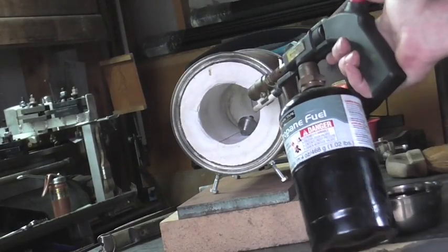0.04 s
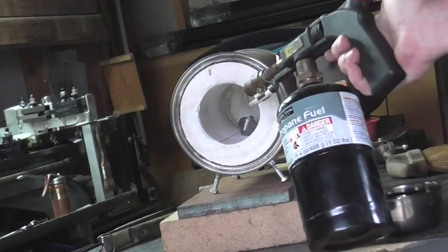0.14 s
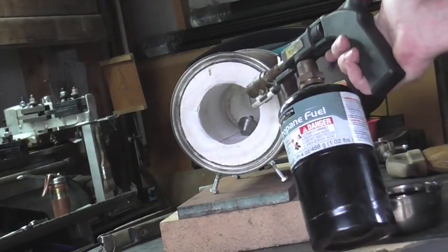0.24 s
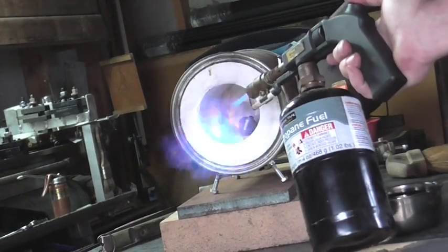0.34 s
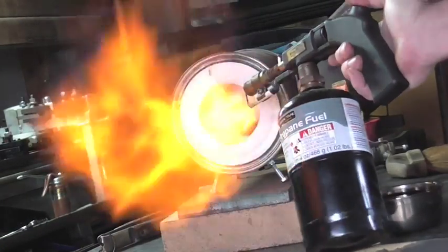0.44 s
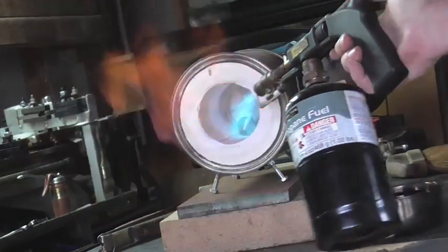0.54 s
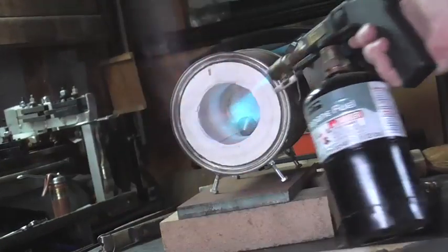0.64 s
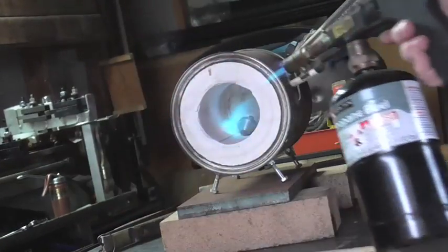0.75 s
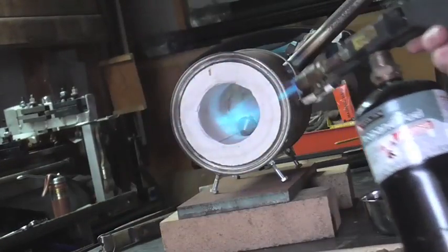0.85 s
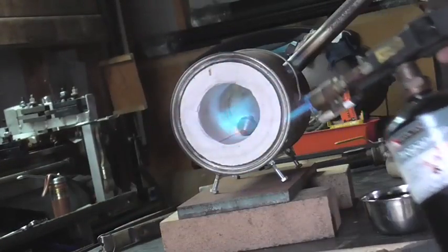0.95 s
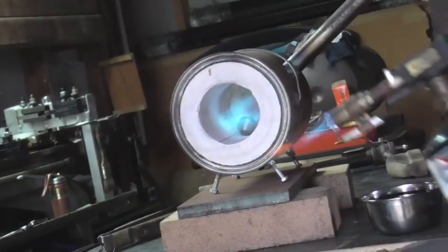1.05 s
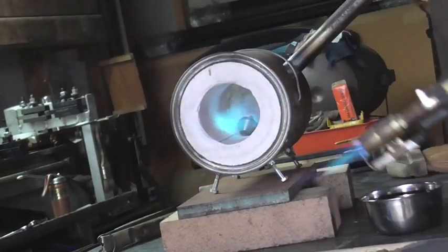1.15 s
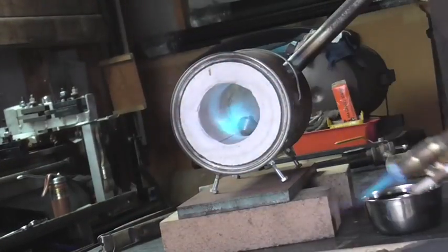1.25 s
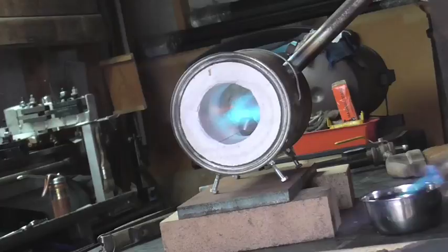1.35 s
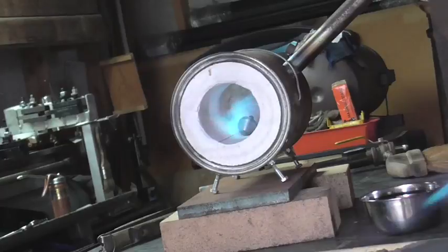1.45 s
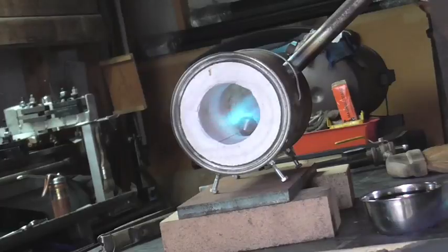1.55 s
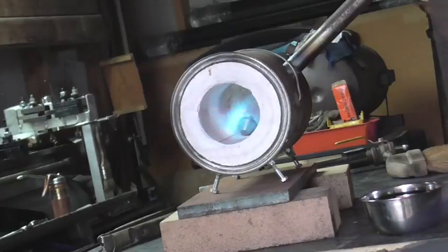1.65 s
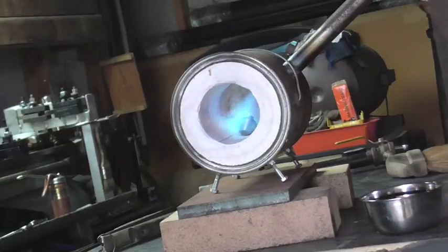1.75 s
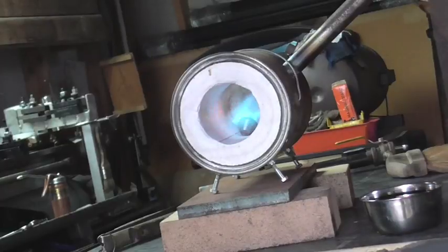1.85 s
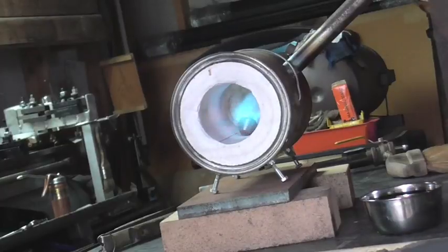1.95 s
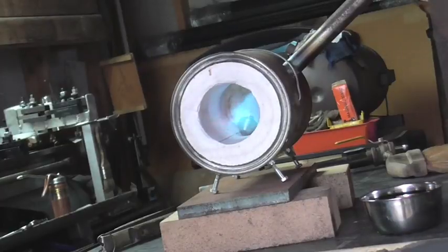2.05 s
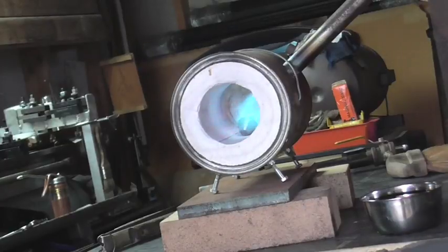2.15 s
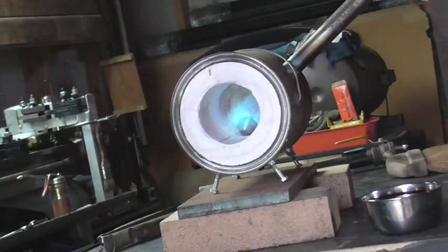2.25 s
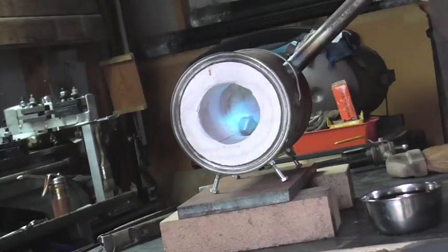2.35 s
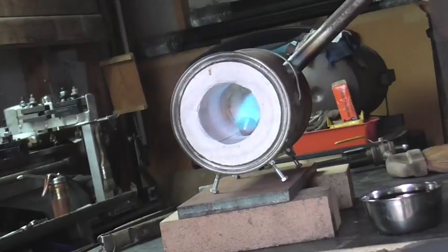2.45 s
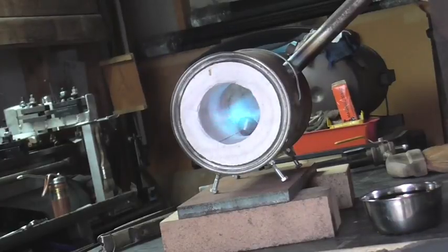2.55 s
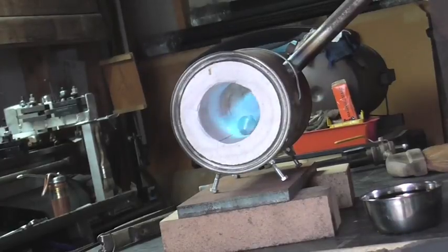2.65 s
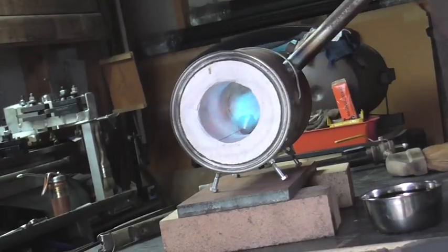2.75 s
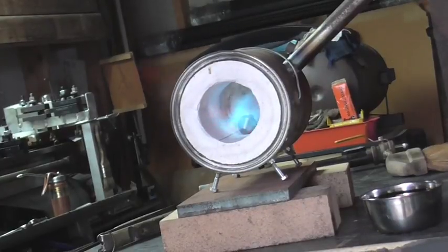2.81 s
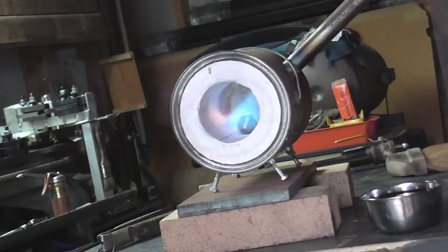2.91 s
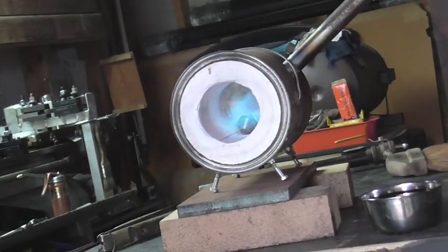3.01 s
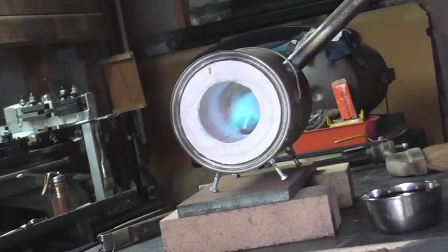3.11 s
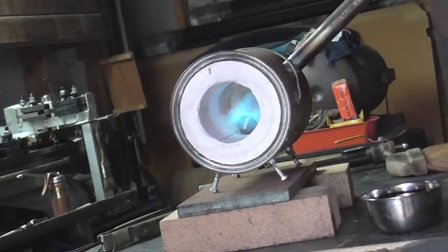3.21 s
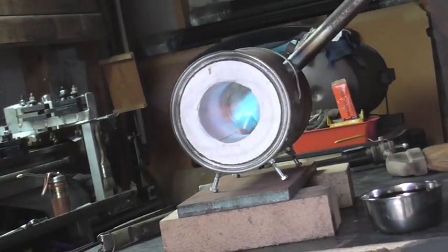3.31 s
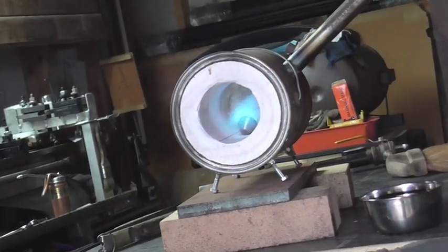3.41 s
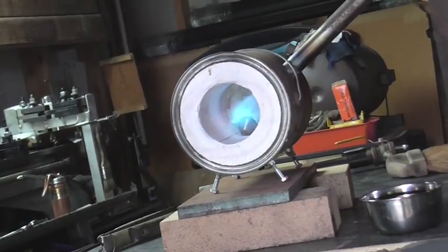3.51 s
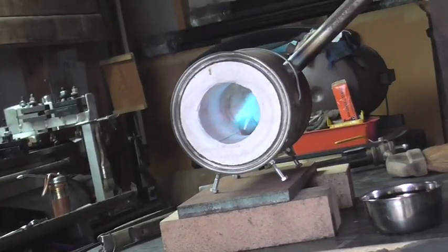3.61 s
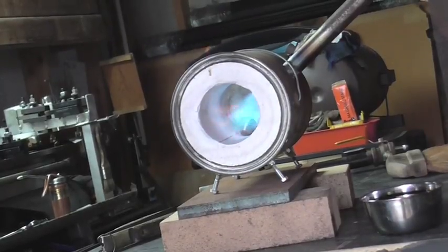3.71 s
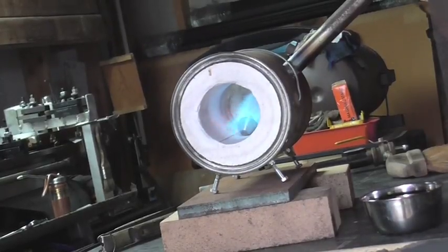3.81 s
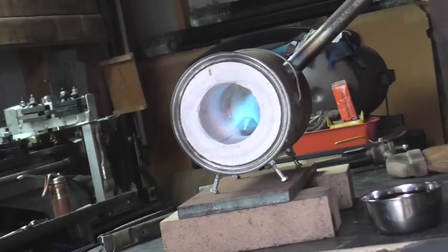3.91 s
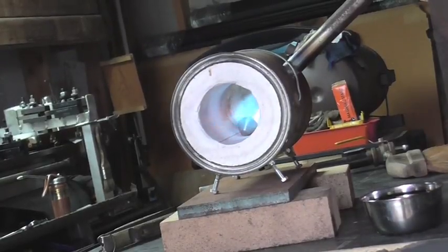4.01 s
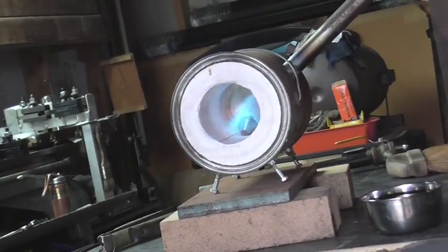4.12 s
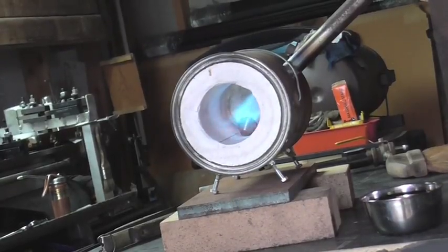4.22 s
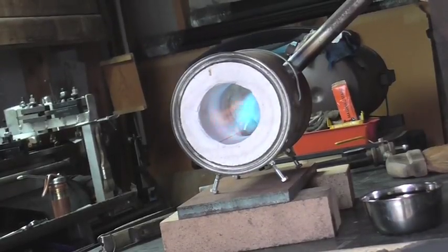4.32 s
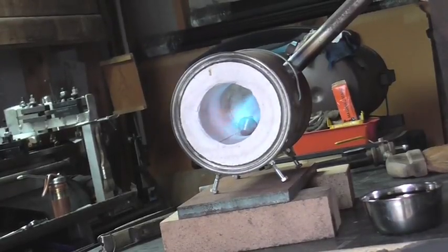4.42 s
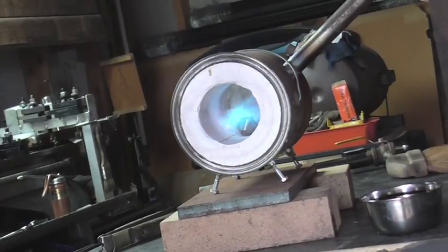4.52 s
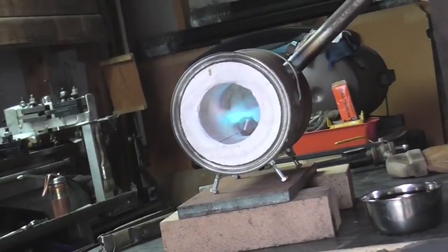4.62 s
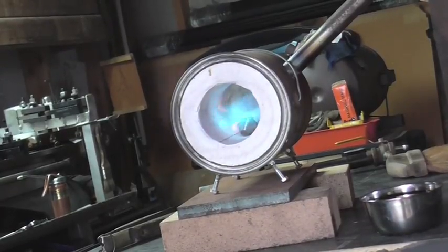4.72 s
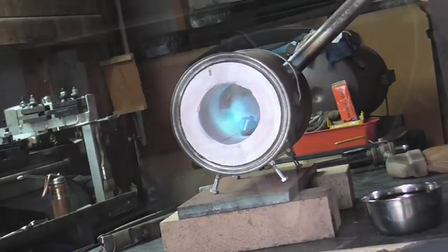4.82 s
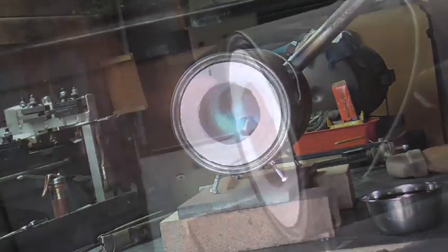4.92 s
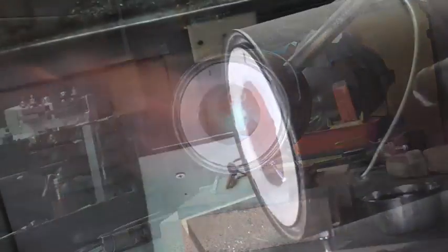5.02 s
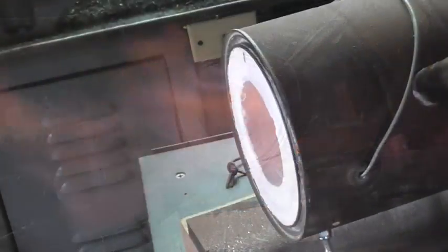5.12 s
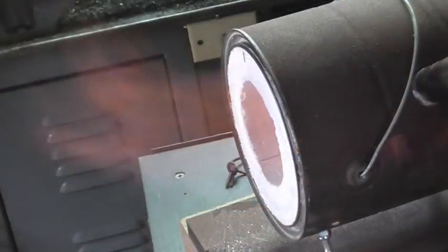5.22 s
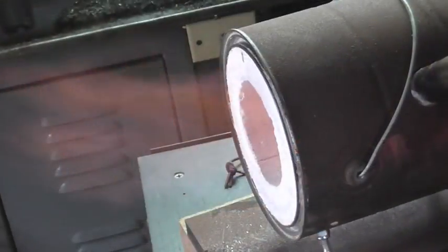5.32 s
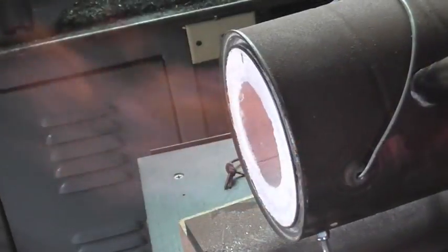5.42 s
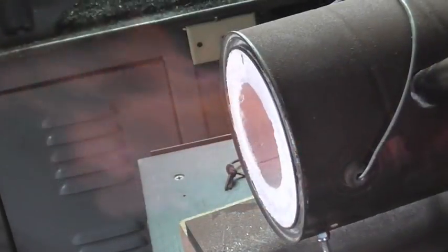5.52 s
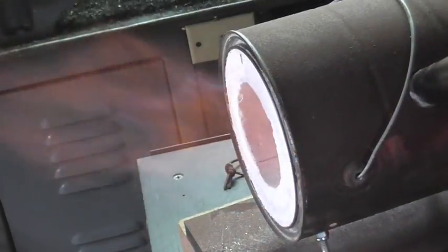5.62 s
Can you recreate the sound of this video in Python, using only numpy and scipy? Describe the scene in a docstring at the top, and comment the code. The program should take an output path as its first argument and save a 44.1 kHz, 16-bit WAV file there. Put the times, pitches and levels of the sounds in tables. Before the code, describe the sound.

A hand torch hisses and clicks, then a small gas forge catches with a whoomph and settles into a sputtering roar.

```python
"""A hand torch hisses and clicks at the mouth of a small propane forge on a workshop bench.
The gas catches with a whoomph, nearly dies, then settles into a roar: turbulent combustion excites
standing waves in chamber and room, over the hiss of the gas jet. The torch is shut off, things are
handled nearby, and at the end the roar is heard from beside the forge."""
import sys
import numpy as np
from scipy import signal
from scipy.fft import rfft, irfft
from scipy.io import wavfile
from scipy.ndimage import uniform_filter1d, minimum_filter1d

SR = 44100
rng = np.random.default_rng(int(sys.argv[2]) if len(sys.argv) > 2 else 0)


def materialize(psi):
    """Save the field psi as 16-bit PCM at rate SR to the path in sys.argv[1].

    A 1-D psi becomes a single channel; in a 2-D psi each row is a channel.
    """
    bounded = np.clip(np.atleast_2d(psi).T, -1, 1)
    quanta = np.round(bounded * 32767).astype(np.int16)
    wavfile.write(sys.argv[1], SR, quanta)


N = 249606
TIME = np.arange(N) / SR
FREQ = np.maximum(np.fft.rfftfreq(N, 1 / SR), 1)
FIRE_START_S, FIRE_GROW_S = 0.66, 0.078  # the steady fire takes hold

# Spectral envelope of the roar, in front and at the side. Each row: frequency in Hz, level in dB.
ROAR_SPECTRUM_FRONT = [(30, -23), (65, -31), (95, 4.5), (280, 1.5), (470, -6.5), (880, -2.5), (1080, -20),
                       (1450, -29.5), (1950, -39), (2600, -53.5), (3000, -52), (6000, -68.5)]
ROAR_SPECTRUM_SIDE = [(30, -47), (65, -36), (95, -13), (280, -1), (470, -9), (850, -3), (1000, -13),
                      (1650, -27), (1900, -40), (2600, -57), (3000, -59), (6000, -78)]
# Peaks and nulls of standing waves at the two places. Each row: centre in Hz, width in Hz, gain in dB.
STANDING_WAVES_FRONT = [(78.4, 10, 2), (153, 16.7, -9.5), (207, 23.3, -23), (250, 17, 1.5), (291, 23, -7.5),
                        (374, 30, 3), (395.7, 16.3, -12.5), (407.5, 7.4, 3), (471, 24, -8),
                        (524, 10.5, -22), (544, 55, 5.5), (584.6, 19, 4), (604, 15, -26), (625.5, 5.9, -4),
                        (663, 8.4, -6.5), (680.5, 27, 1), (719, 10.3, -4.5), (745, 17.4, -10), (791, 21, 2),
                        (839.3, 15.4, -12), (870, 14, -5), (906, 40, 1.5), (942, 13, -3), (999, 16, -14.5),
                        (1031, 34, 3.5), (1056, 22, -9), (1163, 12, 6.5), (1268, 41, 5.5), (1784, 80, 4.5)]
STANDING_WAVES_SIDE = [(86.5, 34, 3.5), (292, 23, 0), (432, 20, -6), (582, 16, 9.5), (624, 17, -8),
                       (666, 50, 4.5), (780, 14, 3.5), (970, 46, -19), (1325, 170, -3.5), (1524, 41, -7),
                       (1950, 170, -14), (2200, 150, 7)]
def roar(spectrum, waves, gust, body_db=-14.5, split_hz=195):
    """Combustion noise: unevenly burning eddies excite standing waves, in a flare, then a steady fire."""
    pressure = rfft(colour(noise(), spectrum, waves))
    bass = 1 / (1 + (FREQ / split_hz) ** 16)
    body = unit(irfft(pressure * (1 - bass), N) * undb(-0.16 * gust + walk(23.6)))
    rumble = unit(irfft(pressure * bass, N))
    ignition = flare()
    fire = settle(FIRE_START_S, FIRE_GROW_S)
    body_gain = (ignition + fire * undb(body_db)) * undb(sputtering())
    rumble_gain = ignition * undb(-9) + fire * undb(lapping())
    return body * body_gain + rumble * rumble_gain


def flare(catch_s=0.4904, db=-19.5, attack_s=0.013, hold_s=0.059, t60=0.28):
    """Ignition transient, as a gain: the gas catches, swells, holds and burns out exponentially."""
    return undb(db) * ramp(catch_s, attack_s) * decay(catch_s + attack_s + hold_s, t60)


# Pockets of gas that burn at once. Each row: start in seconds, lift of the roar in dB.
GAS_POCKETS = [(0.705, 6.5), (0.841, 7), (0.88, 0), (1.184, 0), (1.408, 0), (1.862, 7), (2.018, 2.5),
               (2.172, 7.5), (2.292, 9), (2.548, 9), (2.794, 6.5), (3.064, 9.5), (3.145, 2), (3.263, 7.5),
               (3.637, 8.5), (3.851, 5), (3.925, 8), (4.019, 2), (4.375, 9.5), (4.743, 5), (5.419, 5),
               (5.538, 1.5)]
def sputtering(t60=0.073, gather_s=0.014, falter=0.08):
    """Unsteady heat release, as a lift in dB: the roar dips as a pocket gathers and jumps as it burns."""
    lift_db = 0
    for start, db in GAS_POCKETS:
        gathering = (TIME < start) * swell(start - gather_s, gather_s)
        lift_db += db * (fade(start, t60) - falter * gathering)
    return uniform_filter1d(lift_db, size=SR // 300)  # a pocket takes a few milliseconds to burn


# Tongues of flame that puff out of the mouth. Each row: peak time in seconds, lift of the rumble in dB.
FLAME_PUFFS = [(0.997, 9), (1.859, 10), (2.077, 5.5), (2.374, 4), (3.074, 12), (3.35, 6.5), (3.854, 6),
               (4.501, 3), (4.626, 5), (4.963, 12.5), (5.338, 7), (5.596, 6.5)]
def lapping(base_db=-27, feed_db=5.5, puff_s=0.022):
    """Flame pulsating at the mouth radiates bass; this is the level of that rumble in dB."""
    torch_feed_db = feed_db * swell(1.34, 0.21)  # the passing torch adds gas
    return base_db + torch_feed_db + sum(db * swell(peak, puff_s) for peak, db in FLAME_PUFFS)


def howl(hz=245, wander_hz=8, db=-24.5, lull_s=4.0, lull_db=-7):
    """Driven resonance: the fire sustains the chamber's main mode, a restless note with one lull."""
    phase = 2 * np.pi * np.cumsum(hz + wander_hz * walk(25)) / SR
    level_db = db - 0.5 * walk(16) + lull_db * swell(lull_s, 0.32)
    return unit(np.sin(phase)) * settle(FIRE_START_S, FIRE_GROW_S) * undb(level_db)


# Spectrum of the flare as it leaves the mouth. Each row: frequency in Hz, level in dB.
BARK_SPECTRUM = [(60, -38), (110, -6), (170, -11), (240, 8), (360, 15), (470, -3), (900, 2), (1400, -7),
                 (2300, -9), (3000, -42), (8000, -40)]
# Chamber modes that the flare rings. Each row: frequency in Hz, level in dB, 60 dB decay time in seconds.
CHAMBER_MODES = [(103.5, -17, 0.38), (245, -17.5, 0.35), (280.4, -15.5, 0.32), (310, -4, .04),
                 (331, -11.5, 0.26), (360, -24, 0.18), (578, -18.5, 0.4), (807, -20, 0.13), (910, -16, .07),
                 (1022, -21.5, 0.33), (1206, -29, 0.27), (1310, -31, .2)]
def whoomph(start=0.5345, db=-15.5, t60=0.13, rise_s=0.003):
    """Impulse excitation: the flame front bursts out with a bark and leaves the chamber ringing."""
    bark = undb(db) * fade(start, t60) * unit(colour(noise(), BARK_SPECTRUM))
    modes = sum(undb(mode_db) * ringing(start, hz, ring_s) for hz, mode_db, ring_s in CHAMBER_MODES)
    burst = (bark + modes) * ramp(start, rise_s)
    return signal.sosfilt(signal.butter(3, 70, "high", fs=SR, output="sos"), burst)


# Spectrum of the burner's jet, in front and at the side. Each row: frequency in Hz, level in dB.
JET_SPECTRUM_FRONT = [(300, -9), (2000, 9.5), (2800, -9.5), (4700, 3.5), (7300, -1.5), (9500, -7),
                      (12500, -15), (15000, -31)]
JET_SPECTRUM_SIDE = [(300, -20), (2000, 3), (3700, -2.5), (4600, 5.5), (7000, 1), (10000, 0.5), (12300, -3),
                     (14000, -11), (16000, -15)]
# Peaks and nulls of the burner tube at the two places. Each row: centre in Hz, width in Hz, gain in dB.
TUBE_MODES_FRONT = [(2730, 200, -5), (3080, 180, 6), (3400, 110, 5.5), (3750, 100, 2.9), (4400, 150, 1.5),
                    (5340, 260, 4.3), (7200, 500, 1), (8500, 160, 2)]
TUBE_MODES_SIDE = [(2550, 160, -9), (3280, 280, 5), (3650, 300, -3), (4290, 200, 3), (4880, 250, 4),
                   (5130, 200, -5), (5570, 450, 5), (7080, 300, -4), (8570, 200, 4)]
# Faint spits of the jet. Each row: peak time in seconds, lift of the hiss in dB.
JET_SPITS = [(2.43, 5), (3.215, 2), (3.91, 3), (4.3, 4.5), (4.365, 2.5), (4.48, 3), (4.535, 3)]
def jet(spectrum, tube, gust, flutter_db, db=-47.5, unlit_db=-10, spit_s=0.026):
    """Jet noise filtered by the burner tube: it grows as the fire takes hold, flutters and spits."""
    hiss = unit(colour(noise(wide_db=-5), spectrum, tube))
    onset_db = unlit_db * (1 - ramp(FIRE_START_S, 0.26))
    spits_db = sum(lift * swell(peak, spit_s) for peak, lift in JET_SPITS)
    return hiss * undb(db + onset_db + spits_db + flutter_db * gust + walk(30))


def orifice(hz=8570, width_hz=45, db=-63):
    """Aerodynamic whistle: gas sings thinly through the burner's orifice."""
    return undb(db) * whistle(hz, width_hz, waver=0.002)


# Spectrum of the torch's hiss. Each row: frequency in Hz, level in dB.
TORCH_SPECTRUM = [(500, -29), (2900, -12), (3900, -5), (5000, 1.5), (6300, 3.5), (7500, -11.5), (8700, -2),
                  (10500, -13), (15000, -28)]
# Nozzle resonances, lit and blown out. Each row: centre in Hz, width in Hz, gain in dB.
NOZZLE_MODES_LIT = [(4910, 700, 7), (9400, 600, 8.5)]
NOZZLE_MODES_COLD = [(5440, 500, 3.3), (7370, 1000, 20), (10300, 800, 14)]
# Nozzle whistles. Each row: pitch in Hz, shift on warming in Hz, width in Hz, level over the hiss in dB.
NOZZLE_WHISTLES = [(4660, 239.5, 150, -1.5), (9350, -59.5, 220, -18)]
def torch(blown_s=0.51, relit_s=0.705, shut_s=2.33, lit_db=-49.5, growth_db_per_s=1.4, unlit_db=-49):
    """Flow noise excites the nozzle's resonances; the torch is blown out by the flare, relit and shut."""
    lit = 1 - ramp(blown_s, 0.11) + ramp(relit_s, 0.11)
    warmth = settle(relit_s, 0.093)
    sag_hz = 60 * np.maximum(TIME - relit_s, 0)
    whistles = sum(undb(db) * whistle(hz + shift * warmth - sag_hz, width)
                   for hz, shift, width, db in NOZZLE_WHISTLES)
    whistles *= 1 - ramp(shut_s, 0.06)  # they stall first as the pressure drops
    hiss = unit(colour(noise(), TORCH_SPECTRUM, NOZZLE_MODES_LIT))
    hot = (hiss + whistles) * undb(lit_db + growth_db_per_s * TIME)
    cold = unit(colour(noise(), TORCH_SPECTRUM, NOZZLE_MODES_COLD)) * undb(unlit_db)
    flow = 1 - ramp(shut_s, 0.24)
    return (lit * hot + (1 - lit) * cold) * flow * undb(0.6 * walk(19))


# Snaps of trigger and igniter. Each row: start in seconds, level in dB, share of hard crack from 0 to 1.
TORCH_SNAPS = [(0.1705, -22, 0.07), (0.4687, -8.5, 0.97), (0.4696, -19, 0.9), (0.4725, -41, 0.8),
               (0.657, -47, .9), (0.7047, -24, 0.04)]
# Resonances of the torch's body. Each row: centre in Hz, width in Hz, gain in dB.
TORCH_BODY_MODES = [(2700, 700, 1), (4720, 890, 13.5), (5370, 540, 5), (7700, 1200, 11), (12700, 2000, 10),
                    (15100, 700, 7)]
# Spectra of a soft tick, a hard crack and the room's dulling. Each row: frequency in Hz, gain in dB.
TICK_SPECTRUM = [(40, -30), (200, 6), (1200, 2), (3000, 0), (6000, -3), (9000, -6), (12000, -11),
                 (15000, -22)]
CRACK_SPECTRUM = [(40, -35), (200, 0), (800, -1.5), (3000, -1), (5500, -3), (7200, -6), (8500, -1.5),
                  (11200, -12), (13300, -11.5), (15000, -11)]
TAIL_FILTER = [(6000, 0.5), (10000, -4.5), (15000, -7)]
def clicks(snap_t60=0.0076, tail_t60=0.26, ping_hz=4700, ping_t60=0.2):
    """Impact noise: each snap pings the torch or cracks broadly, then reverberates with a duller tail."""
    tick = unit(colour(noise(wide_db=2), TICK_SPECTRUM, TORCH_BODY_MODES))
    crack = unit(colour(noise(wide_db=2), CRACK_SPECTRUM))
    snaps, tails = 0, 0
    for start, db, hard in TORCH_SNAPS:
        burst = undb(db) * (np.sqrt(1 - hard) * tick + np.sqrt(hard) * crack)
        ping = (1 - hard) * undb(db - 9) * ringing(start, ping_hz, ping_t60)
        snaps += burst * fade(start, snap_t60) + ping
        tails += burst * fade(start, tail_t60) * undb(-9 - 7 * hard)
    return snaps + colour(tails, TAIL_FILTER)


# Ticks, knocks and scuffs nearby. Each row: start in seconds, level in dB, centre in Hz, width in Hz,
# rise in seconds, 60 dB decay time in seconds, metallic ring from 0 to 1.
CONTACTS = [(0.1133, -43, 13500, 8000, .0004, .014, 0), (2.535, -37, 2760, 600, 0.0023, 0.1, .1),
            (3.362, -44, 6550, 3300, 0.033, 0.33, 0.1), (3.393, -49, 7000, 6000, .0003, 0.02, 0),
            (3.4181, -27, 3100, 3200, 0.0005, 0.011, 0), (3.419, -31.5, 1850, 800, 0.001, 0.25, 0.1),
            (3.419, -38.5, 4350, 3400, 0.0048, 0.33, 0.1), (3.4363, -33, 4500, 7000, .0003, 0.0092, 0.1),
            (4.127, -40.5, 3000, 6000, .002, .05, 0), (4.94, -40, 6000, 16000, 0.017, 0.28, 1),
            (5.021, -34.5, 5500, 13100, 0.017, 0.2, 1)]
# Resonances of the metal that is touched. Each row: centre in Hz, width in Hz, gain at full ring in dB.
METAL_MODES = [(3370, 2500, 8), (4600, 730, -5), (5770, 260, 13), (9150, 2000, 6.5)]
def handling():
    """Impact and friction: each light contact excites one band of noise, coloured by the metal's modes."""
    contacts = 0
    for start, db, hz, width, rise, t60, metallic in CONTACTS:
        resonance = 1 / (1 + 1j * (FREQ ** 2 - hz ** 2) / (FREQ * width))
        band = irfft(rfft(noise()) * resonance ** 2, N)
        modes = [(centre, spread, metallic * gain) for centre, spread, gain in METAL_MODES]
        rub = unit(colour(band, [(1000, 0.22), (15000, -1.1)], modes))
        contacts += undb(db) * ramp(start, rise) * decay(start + rise, t60) * rub
    return contacts


def room(x, wet_db=-6, t60=0.12):
    """Interference: reflections off bench and walls add to the direct sound and ripple its treble."""
    response = (noise() * fade(0.0015, t60))[:, :SR // 2]
    response /= np.sqrt(np.sum(response ** 2) / 2)
    reflections = signal.fftconvolve(x, response, axes=1)[:, :N]
    return x + undb(wet_db) * colour(reflections, [(950, -24), (1700, 0)])


# Spectrum of unlit gas and air rushing through the chamber. Each row: frequency in Hz, level in dB.
DRAUGHT_SPECTRUM = [(100, -0.5), (420, -10), (650, 0), (900, 3.5), (1300, 1), (1900, -9), (2400, -19.5),
                    (3000, -27.5), (6000, -48)]
def draught(db=-37.5):
    """Cavity resonance: air drawn through the chamber stirs its low modes."""
    modes = [(244, 24, 15.5), (315, 53, 14.3), (870, 75, 3.5)]
    return undb(db) * unit(colour(noise(), DRAUGHT_SPECTRUM, modes))


# Spectrum of the workshop's drone. Each row: frequency in Hz, level in dB.
DRONE_SPECTRUM = [(20, -48), (45, -17), (90, -5.5), (116, 3), (170, -7), (210, -14), (300, -23), (430, -32),
                  (2000, -47)]
def workshop(drone_db=-39, hum_hz=115, hum_db=-43):
    """Ambient noise: a low broadband drone with a pure hum superposed."""
    drone = unit(colour(noise(), DRONE_SPECTRUM))
    return undb(drone_db) * drone + undb(hum_db) * np.sin(2 * np.pi * hum_hz * TIME)


# How much left and right differ. Each row: frequency in Hz, side level relative to mid in dB.
STEREO_SPREAD = [(40, -16), (100, -24), (200, -24), (400, -20), (700, -17), (1300, -13), (2400, -12),
                 (6000, -20), (9500, -11)]
def noise(wide_db=0):
    """Partial coherence: white noise at two close points is nearly alike; wide_db adds difference."""
    mid, side = rng.standard_normal((2, N))
    return mid + undb(wide_db) * colour(side, STEREO_SPREAD) * np.array([[1], [-1]])


def colour(x, outline, peaks=()):
    """Spectral shaping by an outline of (Hz, dB) points, plus (Hz, width in Hz, dB) peaks and nulls."""
    hz, db = np.transpose(outline)
    gain_db = np.interp(np.log(FREQ), np.log(hz), db)
    for centre, width, height in peaks:
        gain_db += height * 0.5 ** ((2 * (FREQ - centre) / width) ** 2)
    return irfft(rfft(x) * undb(gain_db), N)


def whistle(hz, width_hz, waver=0.0084, flicker_db=1.5):
    """Quadrature modulation: a narrow band of noise flickers around a wavering pitch."""
    phase = 2 * np.pi * np.cumsum(hz * (1 + waver * walk(5.3))) / SR
    band = walk(width_hz) * np.cos(phase) + walk(width_hz) * np.sin(phase)
    return unit(band * undb(flicker_db * walk(12)))


def ringing(start, hz, t60, waver=0.0051):
    """Damped free vibration: a struck mode dies away, slightly unsteady in pitch."""
    age = np.maximum(TIME - start, 0)
    drift_s = waver * np.cumsum(walk(37) * (age > 0)) / SR
    return fade(start, t60) * np.sin(2 * np.pi * hz * (age + drift_s))


def walk(fast_hz, slow_hz=9):
    """Random flutter of rms 1: noise rolled off below slow_hz and above fast_hz."""
    band = FREQ ** 2 / (FREQ ** 2 + slow_hz ** 2) / (1 + (FREQ / fast_hz) ** 4)
    return unit(irfft(rfft(rng.standard_normal(N)) * band, N))


def decay(start, t60):
    """Exponential damping: 1 until start, then down 60 dB every t60 seconds."""
    return np.exp(-np.log(1000) * np.maximum(TIME - start, 0) / t60)


def fade(start, t60):
    """Impulse envelope: silence until start, then exponential decay."""
    return (TIME >= start) * decay(start, t60)


def ramp(start, length):
    """Linear rise from 0 at start to 1."""
    return np.clip((TIME - start) / length, 0, 1)


def settle(start, lag):
    """First-order lag from 0 at start towards 1."""
    return 1 - np.exp(-np.maximum(TIME - start, 0) / lag)


def swell(middle, width):
    """Gaussian pulse of height 1."""
    return np.exp(-((TIME - middle) / width) ** 2)


def undb(db):
    """Decibels to amplitude gain."""
    return 10 ** (np.asarray(db) / 20)


def unit(x):
    """Normalisation to rms 1."""
    return x / np.sqrt(np.mean(x ** 2))


def scene(move_start_s=4.73, move_end_s=5.28):
    """Superposition of all sources; the sound in front of the forge crossfades to that at its side."""
    gust = walk(26)  # one turbulence modulates both roar and jet
    front_roar = roar(ROAR_SPECTRUM_FRONT, STANDING_WAVES_FRONT, gust)
    front_jet = jet(JET_SPECTRUM_FRONT, TUBE_MODES_FRONT, gust, flutter_db=1.2)
    front = room(front_roar + front_jet + torch() + howl())
    side_roar = roar(ROAR_SPECTRUM_SIDE, STANDING_WAVES_SIDE, gust)
    side_jet = jet(JET_SPECTRUM_SIDE, TUBE_MODES_SIDE, gust, flutter_db=0.6)
    side = room(side_roar + side_jet + orifice())
    moved = ramp(move_start_s, move_end_s - move_start_s)
    forge = (1 - moved) * front + moved * side
    return forge + whoomph() + clicks() + handling() + draught() + workshop()


def record(dry, low_hz=33, top_hz=15600):
    """Band and peak limiting: the deepest bass and the top are cut, and peaks past full scale ducked."""
    sound = signal.sosfilt(signal.butter(3, low_hz, "high", fs=SR, output="sos"), dry)
    sound = signal.sosfilt(signal.ellip(10, 0.1, 80, top_hz, fs=SR, output="sos"), sound)
    peak = np.maximum(np.abs(sound).max(axis=0), 1)
    gain = minimum_filter1d(1 / peak, size=SR // 100)
    return sound * uniform_filter1d(gain, size=SR // 100)


dry = scene()
out = record(dry)
materialize(out)
```